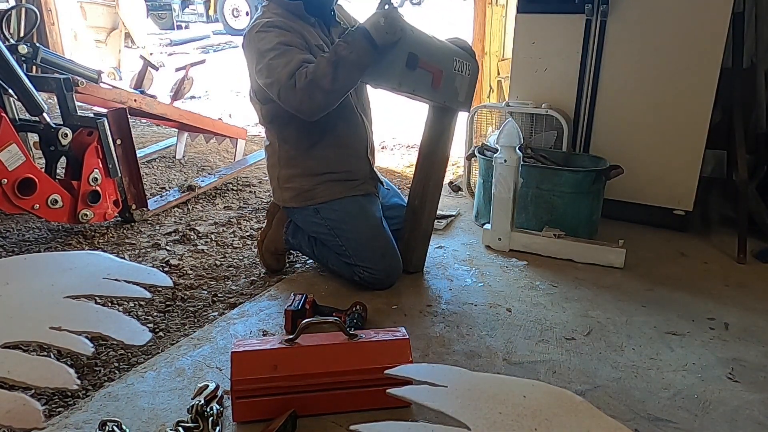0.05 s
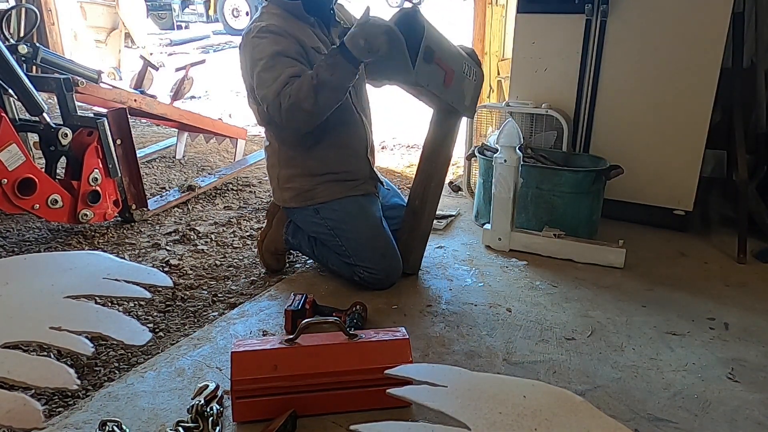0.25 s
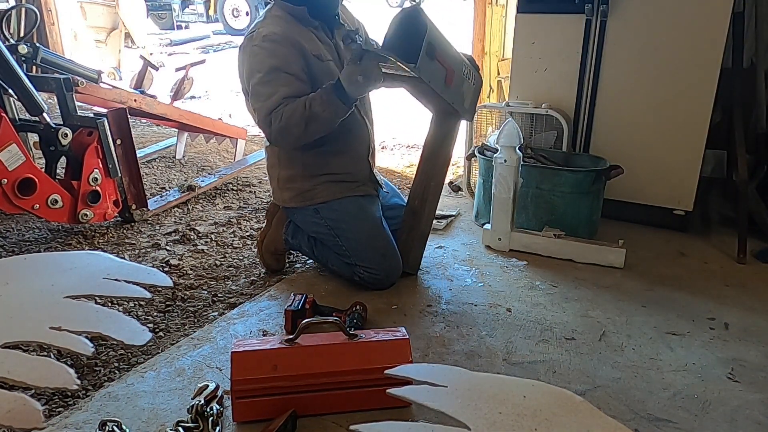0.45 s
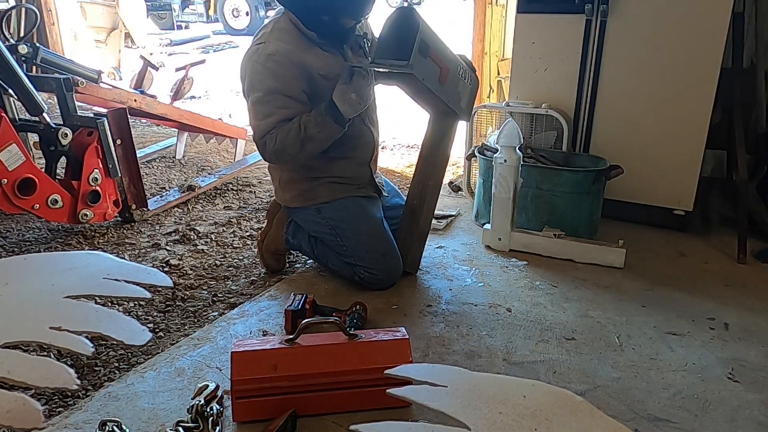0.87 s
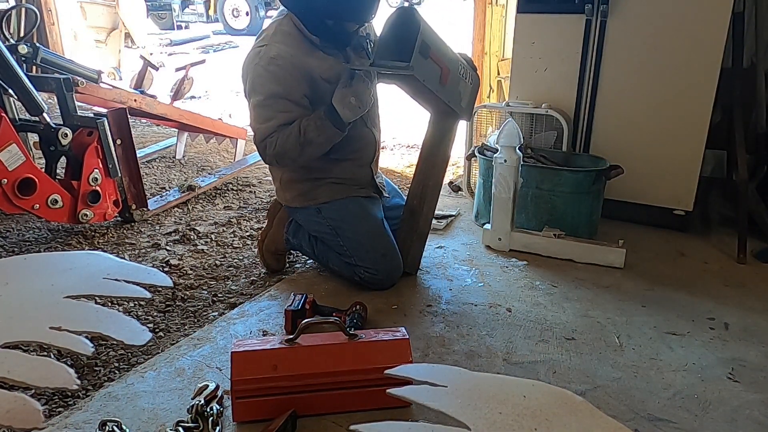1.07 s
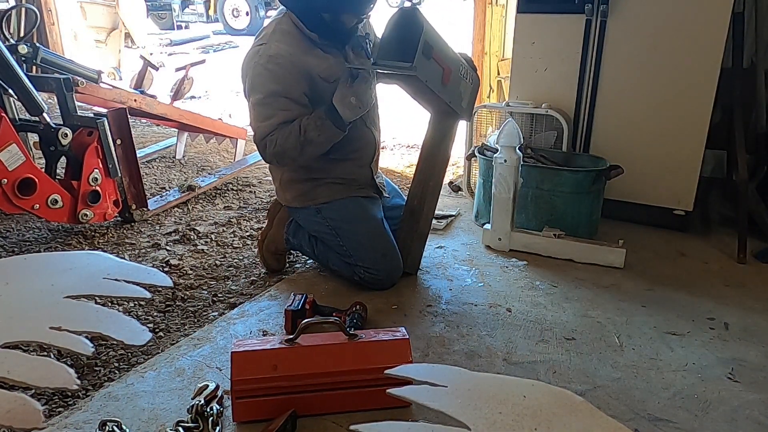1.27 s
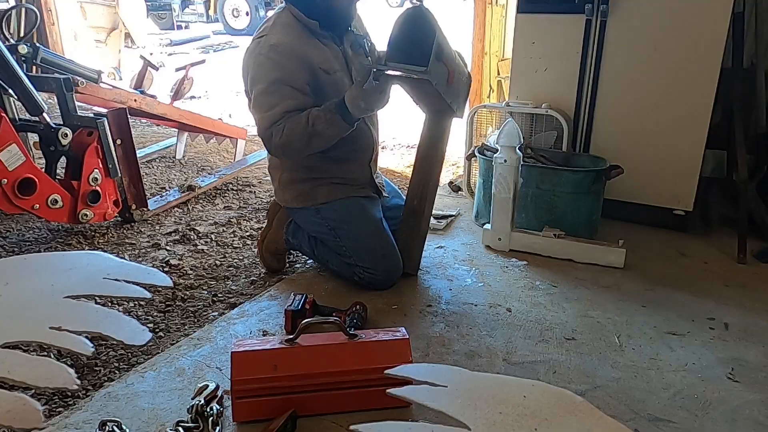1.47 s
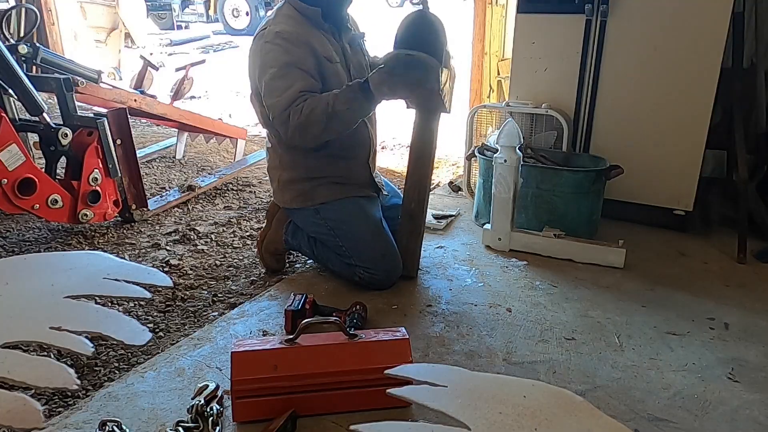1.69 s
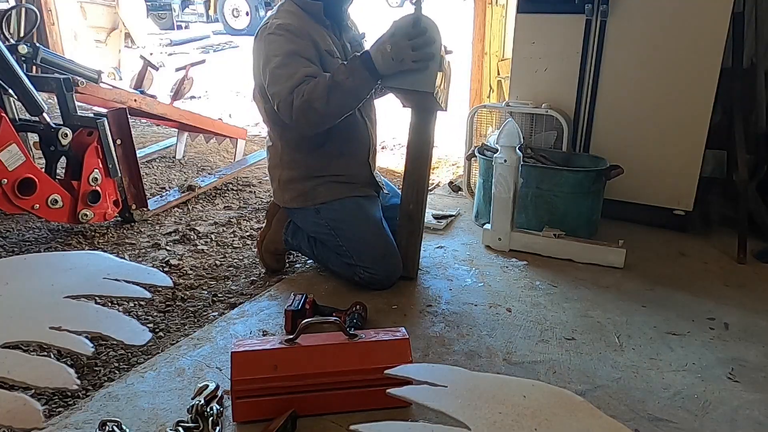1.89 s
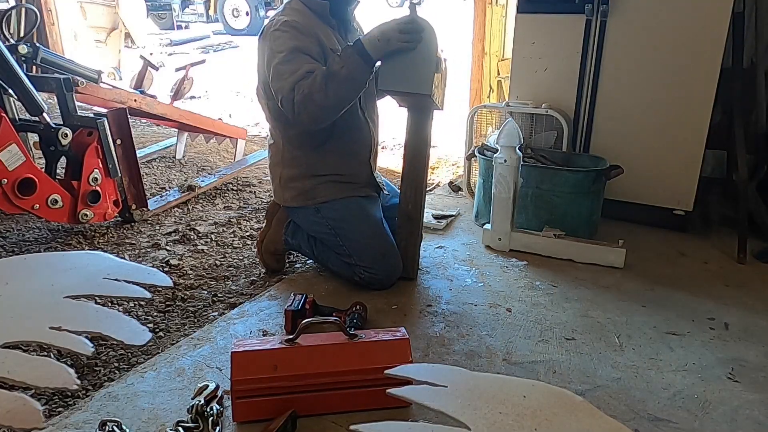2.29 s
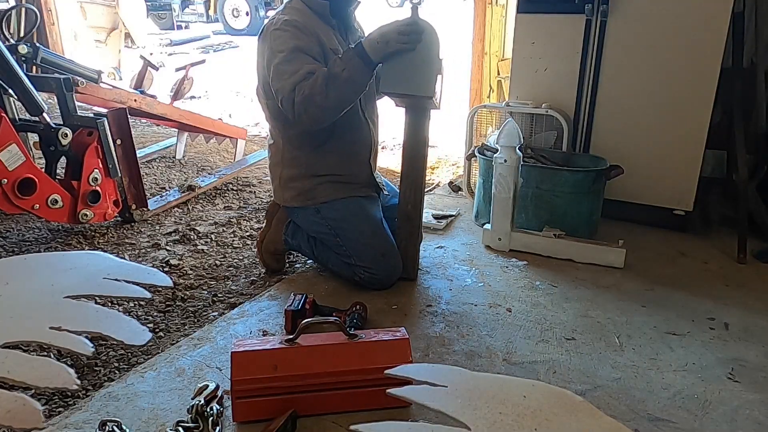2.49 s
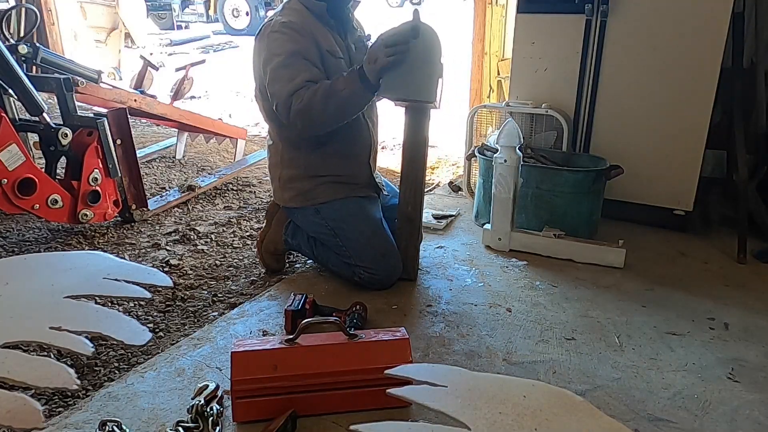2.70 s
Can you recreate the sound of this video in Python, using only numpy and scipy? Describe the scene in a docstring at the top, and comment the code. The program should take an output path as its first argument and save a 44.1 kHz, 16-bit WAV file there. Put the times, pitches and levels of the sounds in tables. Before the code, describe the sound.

A hollow metal mailbox bangs and rumbles against a wooden post in a quiet garage doorway, a few metres from the microphone. Its tight edges tick and creak, two ringing knocks seat it, and a hissing scrape follows.

```python
"""A sheet-metal mailbox is worked onto a wooden post in a garage doorway, a few metres away, in mono.
Over quiet air the rubbed shell starts to rumble; an edge ticks, the metal bangs and the panels flex
and boom. Tight edges creak and tick as the box slides round on the wood with a hiss. Near 1.9 and
2.5 seconds it is knocked home, clanging, and a last slide swells at the end. Every contact rings
the hollow box and leaves a short room tail."""
import sys
import numpy as np
from scipy import signal
from scipy.io import wavfile

SR = 44100
rng = np.random.default_rng(int(sys.argv[2]) if len(sys.argv) > 2 else 0)


def generate_wav(sig):
    """Save sig (samples, or channels by samples) to the path in sys.argv[1] as 16-bit PCM at SR."""
    pcm = np.round(np.clip(np.atleast_2d(sig).T, -1, 1) * 32767).astype(np.int16)
    wavfile.write(sys.argv[1], SR, pcm)


N = 125685
TIME = np.arange(N) / SR
HIT_TIME = TIME[:SR // 2]
BAND_EDGES = np.geomspace(22, 17000, 24)
BAND_HZ = np.sqrt(BAND_EDGES[1:] * BAND_EDGES[:-1])


def amp(db):
    """Decibels to gain."""
    return 10 ** (np.asarray(db) / 20)


def unit_power(x):
    """Scale to an RMS of one."""
    return x / np.sqrt(np.mean(x ** 2) + 1e-20)


def butter(x, order, hz, kind):
    """A Butterworth filter."""
    return signal.sosfilt(signal.butter(order, hz, kind, fs=SR, output="sos"), x)


def per_band(rows, column=1):
    """One column of a table over frequency, read at the band centres."""
    rows = np.array(rows)
    return np.interp(np.log(BAND_HZ), np.log(rows[:, 0]), rows[:, column])[:, None]


def fader(rows):
    """A level ride as a gain for every sample."""
    return amp(np.interp(TIME, *np.transpose(rows)))


def noise_bands():
    """Adjacent bands of noise, unit power per octave."""
    white = rng.standard_normal((2, N + SR // 2))
    bands = [unit_power(butter(white[k % 2], 2, BAND_EDGES[k:k + 2], "band")[-N:])
             for k in range(len(BAND_HZ))]
    return np.array(bands) * np.sqrt(np.log2(BAND_EDGES[1] / BAND_EDGES[0]))


def colour(bands, spectrum):
    """Mix the bands at the levels of a spectrum."""
    return np.sum(bands * amp(per_band(spectrum)), axis=0)


def envelope(attack, t60):
    """Linear rise, then an exponential decay; both in seconds."""
    decay = np.exp(-np.log(1000) * np.maximum(HIT_TIME - attack, 0) / t60)
    return np.minimum(HIT_TIME / attack, 1) * decay


def burst(bands, db, shape):
    """Countless modes ringing together: a random stretch of the noise bands under an envelope."""
    i = int(rng.random() * (N - len(HIT_TIME)))
    return np.sum(bands[:, i:i + len(HIT_TIME)] * amp(db) * shape, axis=0)


def add(out, start, sound):
    """Mix a sound in at a start in seconds."""
    i = int(start * SR)
    out[i:i + len(sound)] += sound[:max(N - i, 0)]


def resonate(x, modes):
    """Parallel resonances driven by x."""
    out = 0
    for hz, db, t60 in modes:
        r = np.exp(-np.log(1000) / (t60 * SR))
        feedback = [1, -2 * r * np.cos(2 * np.pi * hz / SR), r * r]
        out = out + amp(db) * (1 - r * r) / 2 * signal.lfilter([1, 0, -1], feedback, x + 1e-18)
    return out


# The background bed. Each row: frequency in Hz, level in dB per octave.
AIR_SPECTRUM = [(30, -66.5), (120, -66.5), (250, -71), (600, -70), (2000, -69), (6000, -74), (14000, -113)]

def air():
    """Quiet, steady air under the whole scene."""
    return colour(noise_bands(), AIR_SPECTRUM)


# The rumble's level ride. Each row: time in seconds, level in dB.
RUMBLE_RIDE = [(.13, -50.5), (.17, -45.5), (.21, -47.5), (.34, -23.5), (.47, -47), (.61, -41.5), (.69, -30),
               (.8, -38.5), (.9, -47.5), (.99, -56), (1.02, -40), (1.05, -51), (1.3, -52.5), (1.5, -44.5),
               (1.75, -50), (1.87, -29.5), (2.0, -67), (2.13, -49), (2.31, -47.5), (2.39, -36),
               (2.7, -43.5)]
# Its dark tone. Each row: frequency in Hz, level in dB per octave.
RUMBLE_SPECTRUM = [(60, -54), (130, -9), (210, -2.5), (320, -9), (520, -7), (1000, -15.5), (2500, -21),
                   (6000, -25)]

def shell_rumble(bands):
    """The rubbed shell rumbles as it is pushed about."""
    return fader(RUMBLE_RIDE) * colour(bands, RUMBLE_SPECTRUM)


# The hollow body. Each row: pitch in Hz, gain in dB, 60 dB decay time in seconds.
BOX_MODES = [(132.4, -6, 0.47), (142.8, -8.5, 0.56), (183.6, 0.5, 0.37), (234, -8.5, 0.24),
             (260.5, -1.5, 0.37), (371.3, 8.5, 1.17), (522.3, 2, 0.25), (735, 3.5, 0.59)]

def hollow_box(contacts):
    """The contacts, plus the low modes they ring in the box."""
    return contacts + resonate(contacts, BOX_MODES)


# The slide's level ride. Each row: time in seconds, level in dB.
SLIDE_RIDE = [(.205, -56.5), (.235, -34.5), (.37, -45.5), (.42, -53.5), (.62, -57), (.68, -41.5),
              (.79, -64), (.96, -59.5), (1.015, -54), (1.07, -69.5), (1.3, -64), (1.39, -57), (1.50, -48),
              (1.523, -38), (1.56, -48.5), (1.87, -40.5), (2.0, -41.5), (2.1, -51.5), (2.31, -55.5),
              (2.40, -61), (2.56, -50), (2.69, -56.5), (2.85, -39.5)]
# Its bright tone. Each row: frequency in Hz, level in dB per octave.
SLIDE_SPECTRUM = [(500, -17.5), (1500, -9), (3200, -9), (6000, -5.5), (11500, -4), (15000, -9.5)]

def slide_hiss(bands, catches_per_s=210, grit_db=-9.5):
    """Metal slides on wood: a hiss, gritty with small catches."""
    catches = (rng.random(N) < catches_per_s / SR) * rng.uniform(-1, 1, N)
    grit = unit_power(butter(catches + 1e-18, 1, [3000, 12000], "band"))
    return fader(SLIDE_RIDE) * (colour(bands, SLIDE_SPECTRUM) + amp(grit_db) * grit)


# The shell's modes in Hz: the walls below RIM_FROM_HZ, the stiff rim above.
SHELL_HZ = [705, 926, 1205, 1520, 2040, 2229, 4790, 5120, 5530, 6135, 6611, 7005, 7660, 8350, 8800, 11200,
            12400]
RIM_FROM_HZ = 4500
# A snap's tone before tilting. Each row: frequency in Hz, level in dB per octave.
SNAP_SPECTRUM = [(200, -40), (1500, -13), (3900, -12), (5000, -5), (8000, -6), (11800, 4.5), (15000, -6.5)]

def edge_snap(bands, db, tilt, t60, click_db=19, rim_db=3.5, rim_spread_db=2, rim_t60=0.04):
    """One edge snaps past another: a bare click, a bright burst and a tinny rim, new each time."""
    levels = db + per_band(SNAP_SPECTRUM) + tilt * np.log2(BAND_HZ / 10000)[:, None]
    snap = burst(bands, levels, envelope(attack=0.0013, t60=t60))
    rim = [(hz, rng.normal(rim_db, rim_spread_db), rim_t60) for hz in SHELL_HZ if hz > RIM_FROM_HZ]
    snap += resonate(snap, rim)
    click = butter(signal.unit_impulse(128), 3, 7500, "high")
    add(snap, 0, amp(db + click_db) * click)
    return snap


# Lone edge snaps. Each row: start in seconds, level in dB, tilt in dB per octave.
TICKS = [(0.225, -26.5, -2.5), (0.2998, -24.5, -0.5), (0.565, -54, -6), (0.6935, -24.5, 5.5),
         (0.728, -39, -3.5), (1.328, -24, 6.5), (1.471, -32.5, 12), (1.498, -37.5, 22), (2.483, -36, -1),
         (2.7735, -40, -1.5)]

def ticks(bands):
    """Tight edges let go, one tick at a time."""
    out = np.zeros(N)
    for start, db, tilt in TICKS:
        add(out, start, edge_snap(bands, db, tilt, t60=0.063))
    return out


# The EQ points of a knock, in Hz.
KNOCK_HZ = [60, 450, 1300, 3200, 7000, 13000]
# Metal on the post. Each row: start and attack in seconds, then dB per octave at each EQ point.
KNOCKS = [(0.241, 0.00067, -25.5, -17.5, -18, -28.5, -25.5, -36),
          (0.269, 0.0023, -49, -35, -38, -33.5, -34.5, -34),
          (0.664, 0.046, -40, -31.5, -40, -51.5, -51, -60),
          (1.339, 0.00047, -46, -44.5, -54, -44.5, -44, -62),
          (1.886, 0.00041, -38, -29.5, -30, -30.5, -31, -34.5),
          (1.9323, 0.0004, -29, -26, -27.5, -27, -14.5, -15.5),
          (1.937, 0.001, -33.5, -23, -20, -23, -13, -22), (2.337, 0.012, -37, -36, -41.5, -49, -41.5, -48),
          (2.414, 0.004, -35, -27.5, -31, -34.5, -28.5, -40),
          (2.432, 0.016, -58, -35, -40.5, -39, -41, -54), (2.513, 0.0034, -34, -22, -17, -20, -19.5, -19)]
# The ring of the sheet's crowded modes. Each row: frequency in Hz, 60 dB decay time in seconds.
SHEET_DECAY = [(60, 0.19), (450, 0.18), (1300, 0.12), (7000, 0.08), (13000, 0.058)]

def knocks(bands):
    """Hard blows set the whole sheet ringing; the treble dies first."""
    out = np.zeros(N)
    for start, attack, *levels in KNOCKS:
        spectrum = per_band(list(zip(KNOCK_HZ, levels)))
        add(out, start, burst(bands, spectrum, envelope(attack, per_band(SHEET_DECAY))))
    return out


# The pitched ring of hard contacts. Each row: start in seconds, level in dB, centre pitch in Hz.
CLANGS = [(0.242, -13.5, 650), (0.2425, -22, 2020), (0.695, -34, 650), (1.341, -38, 1800),
          (1.937, -11.5, 6600), (1.941, -23.5, 710), (2.446, -31.5, 8500), (2.517, -15.5, 1330),
          (2.518, -27, 2360)]

def clangs(width_octaves=0.28):
    """Each hard contact rings the shell modes around its pitch; the low ones last longer."""
    out, hz = np.zeros(N), np.array(SHELL_HZ)
    shapes = envelope(attack=0.0014, t60=0.026 * (RIM_FROM_HZ / hz[:, None]) ** 0.23)
    for start, db, centre in CLANGS:
        weights = amp(db) * np.exp(-.5 * (np.log2(hz / centre) / width_octaves) ** 2)
        tones = np.sin(2 * np.pi * (hz[:, None] * HIT_TIME + rng.random((len(hz), 1))))
        add(out, start, weights @ (tones * shapes))
    return out


# The boom of flexing panels. Each row: start in seconds, level in dB, pitch in Hz.
THUMPS = [(0.245, -15.5, 125), (0.2467, -9, 223.6), (0.275, -8.5, 214.3), (0.310, -11, 227.3),
          (0.333, -8.5, 221.8), (0.342, -16, 123.5), (0.360, -18, 270.5), (0.390, -19.5, 135.5),
          (0.411, -24.5, 186), (0.671, -24.5, 230), (0.702, -22, 189.4), (0.717, -18.5, 211.7),
          (0.752, -28, 149), (1.457, -33, 132.6), (1.886, -15.5, 211.4), (2.422, -17.5, 135.2),
          (2.464, -16, 184), (2.517, -21, 186), (2.535, -19.5, 216)]

def panel_thumps():
    """A panel gives way and swings for a few cycles, damped by the hands."""
    out, shape = np.zeros(N), envelope(attack=0.004, t60=0.12)
    for start, db, hz in THUMPS:
        add(out, start, amp(db) * np.sin(2 * np.pi * hz * HIT_TIME) * shape)
    return butter(out, 2, 90, "high")  # the thumps carry little deep bass


# Binding edges. Each row: start in seconds, length in seconds, level in dB, tilt in dB per octave.
CREAKS = [(0.44, .026, -33, 2.5), (1.51, 0.019, -33.5, 11)]

def creaks(bands, first_gap_s=0.0055, gap_shrink=0.9):
    """An edge sticks and slips, the slips coming faster and faster."""
    out = np.zeros(N)
    for start, length, db, tilt in CREAKS:
        gaps = first_gap_s * gap_shrink ** np.arange(12) * rng.uniform(.9, 1.1, 12)
        delays = np.cumsum([0, *gaps])
        for delay in delays[delays < length]:
            add(out, start + delay, edge_snap(bands, db, tilt, t60=0.032))
    return out


# The garage's reverb. Each row: frequency in Hz, level in dB, 60 dB decay time in seconds.
ROOM = [(64, -12, 0.1), (216, -3, 0.4), (700, -10, 0.59), (1800, -7.5, 0.4), (6140, -16, 0.3),
        (13100, -16, 0.13)]

def garage_tail(x, bands, onset_s=0.011):
    """Diffuse reflections, lingering longest in the low mids."""
    tails = bands[:, :len(HIT_TIME)] * envelope(onset_s, per_band(ROOM, column=2))
    energy = np.sum(tails ** 2, axis=1, keepdims=True)
    tails *= np.sqrt(2 * np.diff(BAND_EDGES)[:, None] / SR / energy)  # unity gain in each band
    return signal.fftconvolve(x, colour(tails, ROOM))[:N]


def scene():
    """Every contact rings the hollow box; room and air surround it, alike in both channels."""
    bands, friction_bands = noise_bands(), noise_bands()
    hits = knocks(bands) + ticks(bands) + clangs() + panel_thumps() + creaks(bands)
    rumble = shell_rumble(friction_bands[:, ::-1])  # reversed noise, unrelated to the hiss
    mailbox = hollow_box(hits + rumble + slide_hiss(friction_bands))
    return np.tile(mailbox + garage_tail(mailbox, bands) + air(), (2, 1))


def record(dry, low_cut_hz=68, ceiling=0.6, cutoff_hz=15200):
    """The microphone thins the deep bass, the loudest peaks are rounded, and the top is cut steeply."""
    thinned = butter(dry, 2, low_cut_hz, "high")
    softened = butter(thinned, 6, 13900, "low")
    rounded = softened / (1 + (softened / ceiling) ** 6) ** (1 / 6)
    return signal.sosfilt(signal.ellip(8, .3, 80, cutoff_hz, fs=SR, output="sos"), rounded)


dry = scene()
out = record(dry)
generate_wav(out)
```